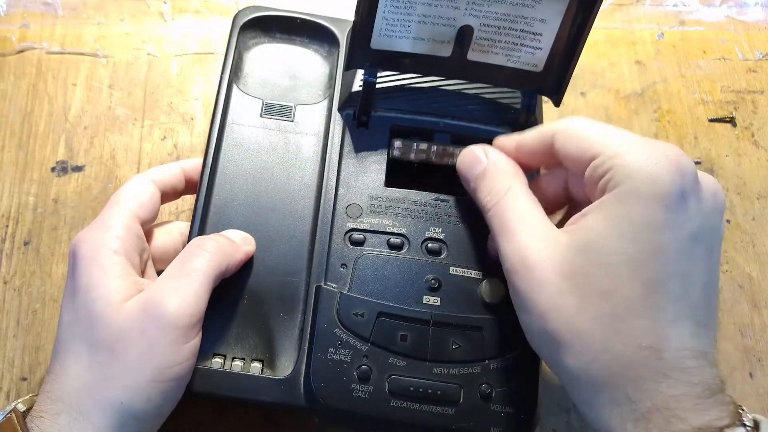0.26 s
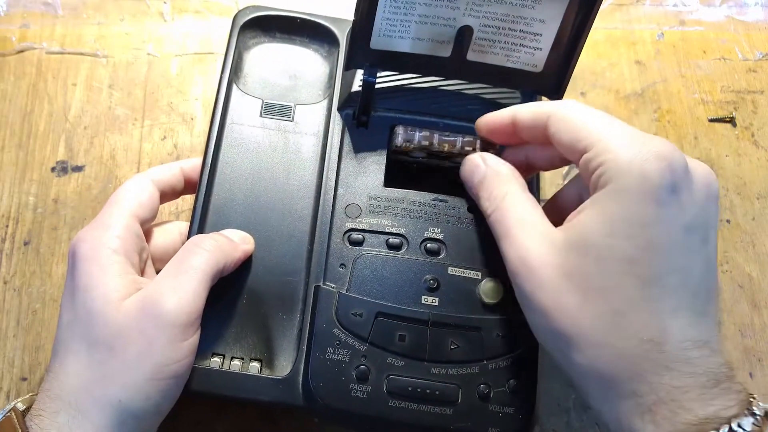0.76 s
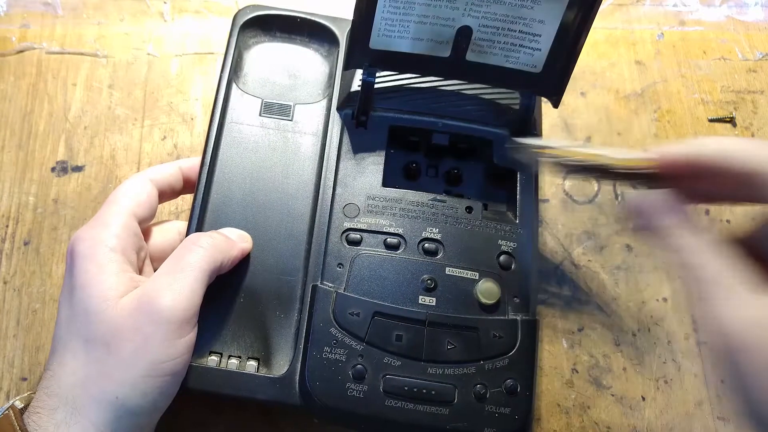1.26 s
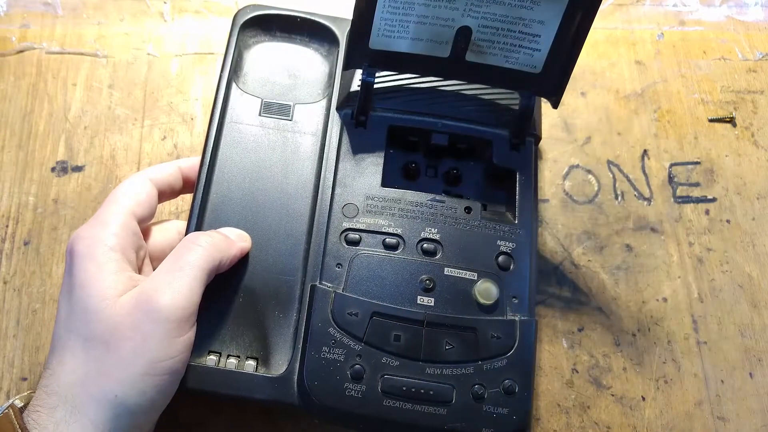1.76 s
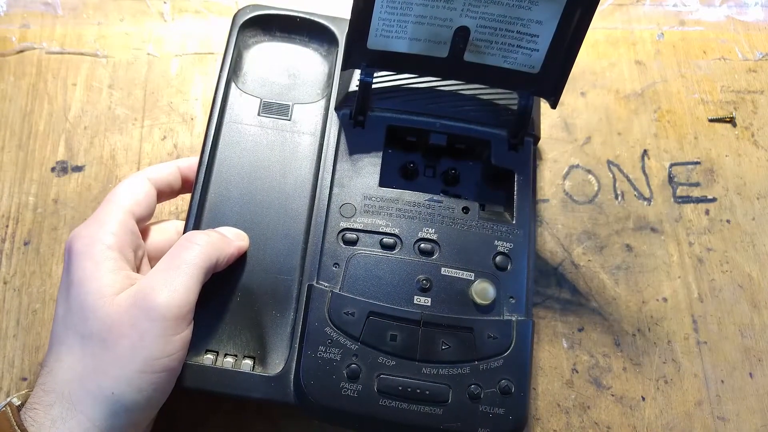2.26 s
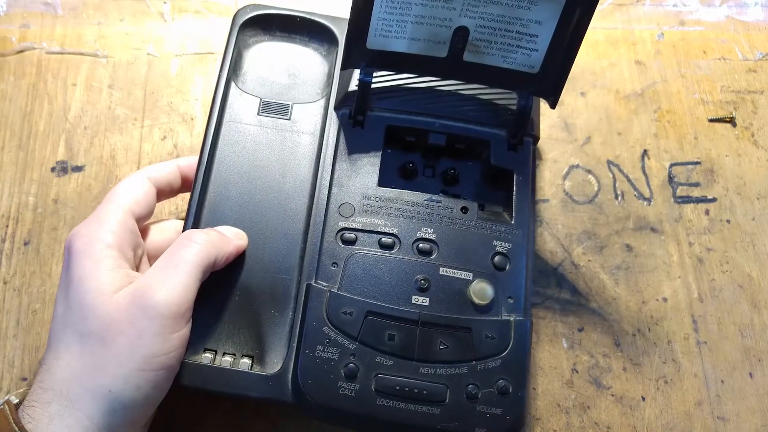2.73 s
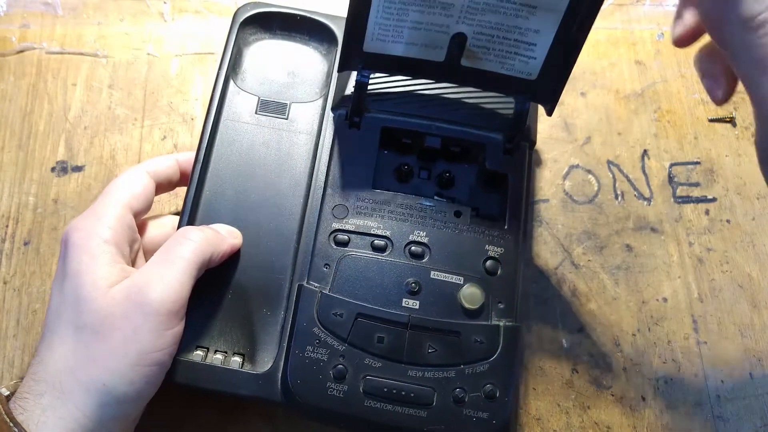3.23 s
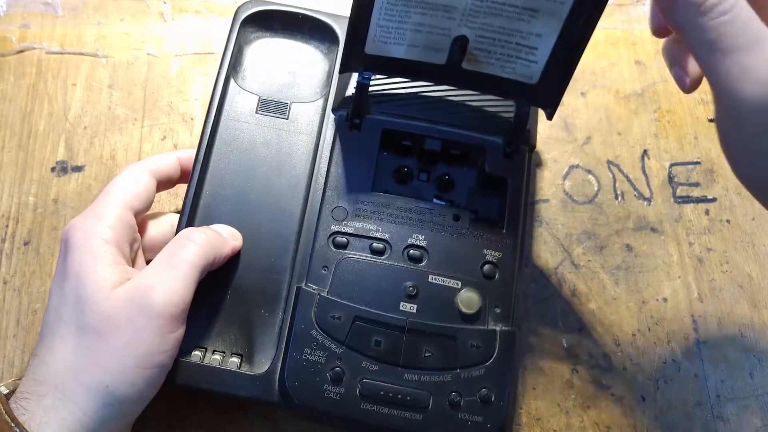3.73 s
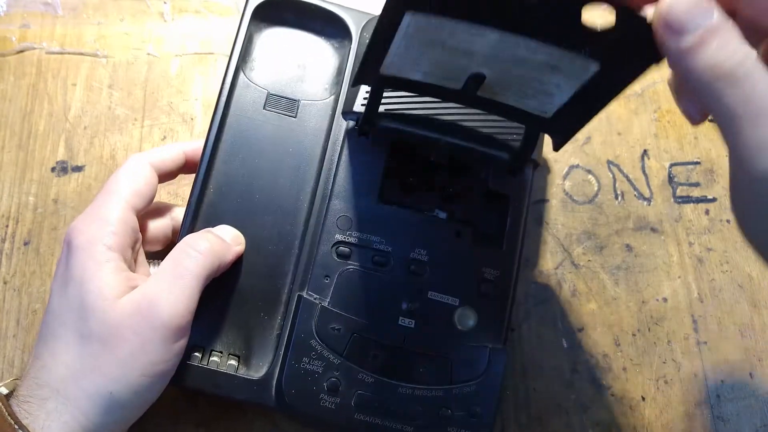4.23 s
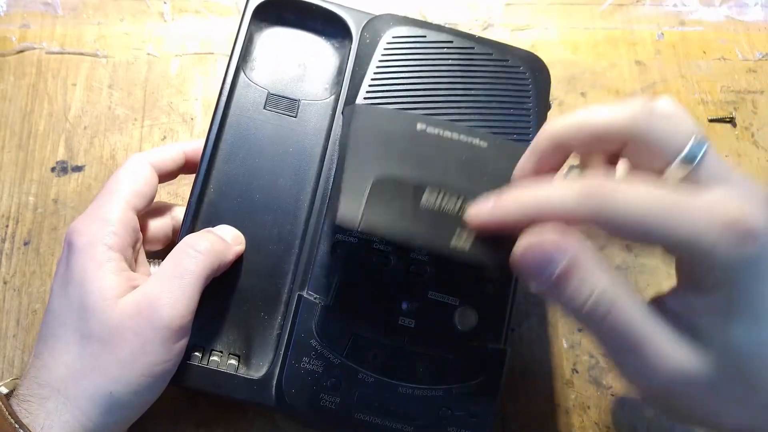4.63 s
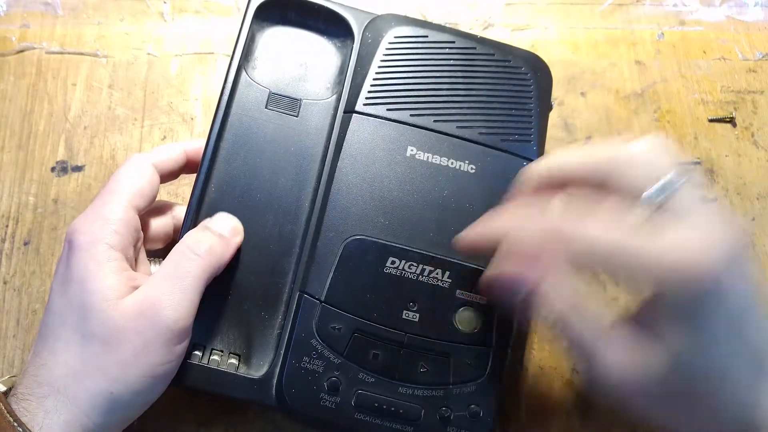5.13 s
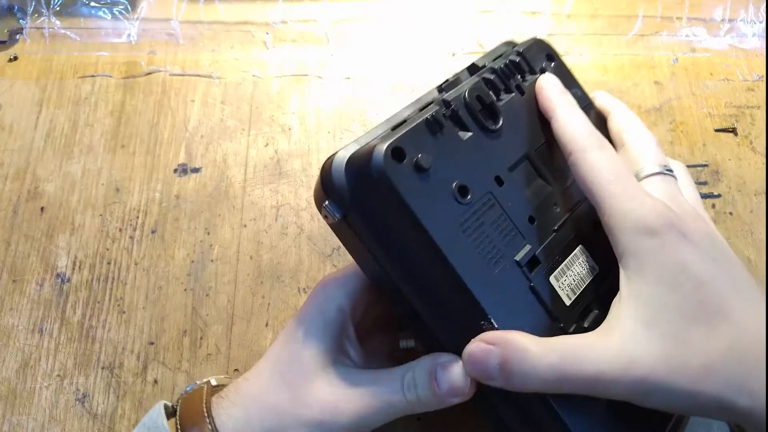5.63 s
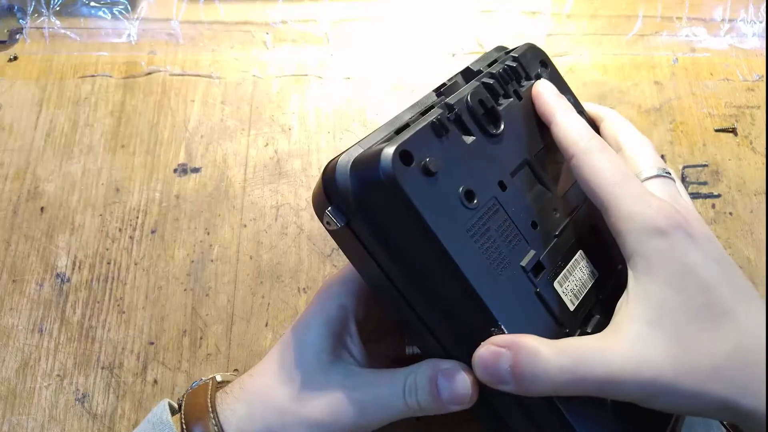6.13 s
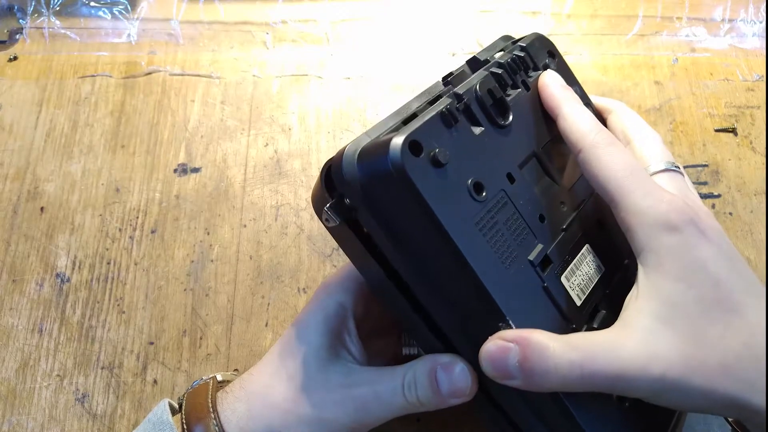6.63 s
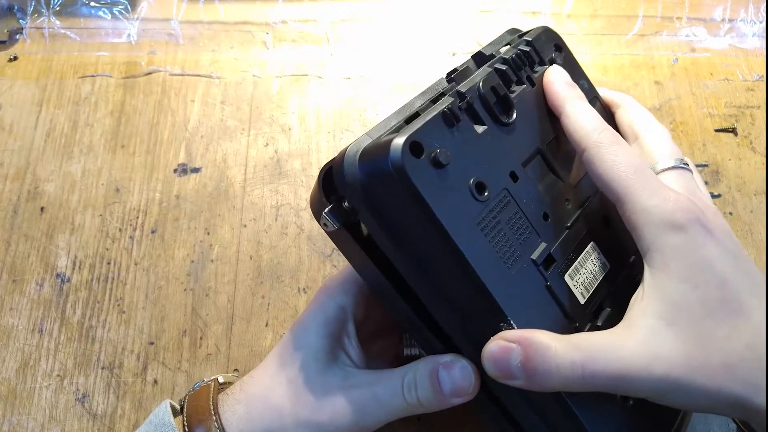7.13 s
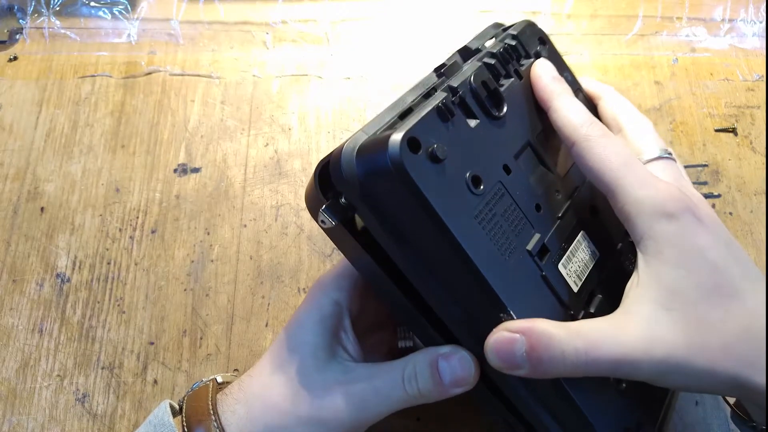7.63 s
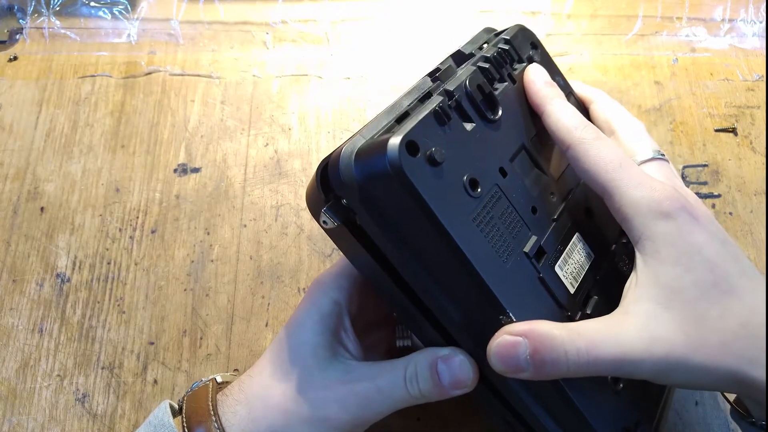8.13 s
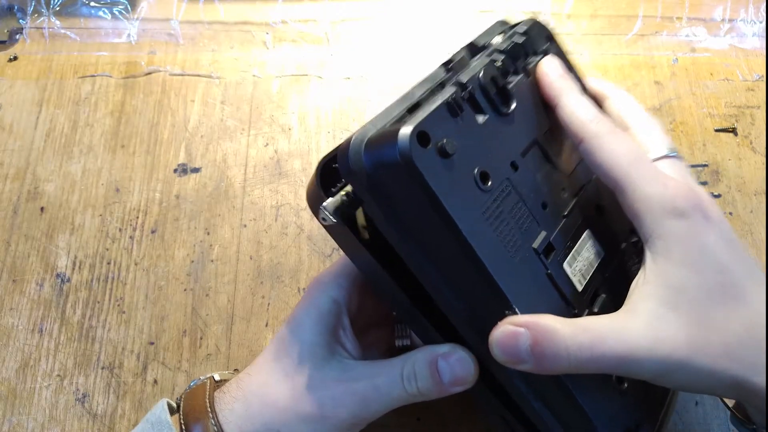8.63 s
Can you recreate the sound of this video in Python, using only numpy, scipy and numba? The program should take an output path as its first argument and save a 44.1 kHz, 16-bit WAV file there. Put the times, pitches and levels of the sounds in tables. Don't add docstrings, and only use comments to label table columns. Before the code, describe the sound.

A small cassette is cracked loose from a hollow plastic desk machine, the lid snaps shut hard, then the closed case is gripped and turned.

```python
import sys
import numpy as np
from scipy import signal
from scipy.fft import rfft, irfft, next_fast_len
from scipy.io import wavfile
from scipy.ndimage import uniform_filter1d
from numba import njit

SR = 44100
rng = np.random.default_rng(int(sys.argv[2]) if len(sys.argv) > 2 else 0)


def waveform_to_disk(signal):
    frames = np.transpose(np.atleast_2d(signal))
    scaled = np.clip(frames, -1, 1) * 32767
    samples = np.round(scaled).astype(np.int16)
    wavfile.write(sys.argv[1], SR, samples)


def makeup_ratio(level_db):
    decades = np.asarray(level_db, float) / 20
    return 10 ** decades


N = 391166
T = np.arange(N) / SR
SCENE_CHANGE_S = 5.512

# frequency in Hz, level in dB per Hz.
STILL_COLOUR = [(15, -31.5), (25, 1), (97, -4), (175, -13.5), (516, -25), (2160, -27.5), (14500, -29),
                (16500, -36)]
STILL_DB = -64.5
# frequency in Hz, decay time to -60 dB in seconds.
ROOM_T60 = [(200, .55), (1000, .16), (3000, .3), (7000, .225), (10000, .19), (14000, .15)]
ROOM_DB = -9.5

# start in seconds, peak level in dB.
JOLTS = [(0.032, -51.5), (0.412, -52.5), (0.61, -52), (1.925, -52), (2.279, -63), (2.369, -59),
         (2.544, -36), (2.866, -41), (2.93, -46), (2.999, -49), (3.189, -47.5), (3.312, -51.5), (3.44, -49),
         (3.56, -46), (3.68, -50), (4.0, -27.5), (4.305, -46), (4.934, -34.5), (5.097, -44), (5.443, -47),
         (5.896, -49), (6.105, -44), (6.145, -57.5), (6.504, -66), (6.569, -50), (6.62, -53), (6.679, -53),
         (8.796, -78)]
# time in seconds, weight in dB.
LEAN = [(0, -78), (.39, -84), (.59, -58), (.79, -80), (1.58, -84.5), (2.6, -70), (3.21, -61.5), (3.43, -54),
        (4.03, -67.5), (4.3, -51.5), (4.89, -81), (5.09, -48.5), (5.34, -54.5), (5.51, -73.5), (5.78, -67),
        (6.79, -72.5), (7.3, -89), (8.0, -72)]
# frequency in Hz, level in dB, decay time to -60 dB in seconds.
BENCH_MODES = [(57.4, -10, .3), (98.3, 1.5, 0.15), (148.4, -5.5, 0.14), (205.4, -7, 0.063),
               (242, -13.5, 0.2)]
# frequency in Hz, width in Hz, level in dB.
SLEEVE_TONES = [(385, 75, -1), (325, 70, -8.5), (865, 90, -23.5), (1930, 300, -21), (225, 120, -17.5)]
# start in seconds, end in seconds, level in dB.
DRAGS = [
    (1.764, 2.28, -52.5),
    (2.35, 2.596, -55),
    (3.35, 3.802, -64),
    (5.05, 5.35, -64),
    (5.7, 6.213, -62),
    (6.451, 6.647, -64),
]
DRAG_RISE_S, DRAG_FALL_S, SLEEVE_REST_DB = .18, .074, -16
PAT_DB, PAT_S = -12, .073

# time in seconds, topmost octave level in dB.
SWISHES = [
    [(1.8, -78.5), (1.806, -84.5), (2.098, -65), (2.26, -63.5)],
    [(4.3, -94), (4.478, -57.5), (4.802, -72.5), (4.88, -62.5)],
]

# time in seconds, sliding level in dB, grip level in dB.
HANDS = [(0, -61, -73), (.3, -66.5, -93), (1.36, -75, -95), (1.73, -72.5, -104), (2.19, -55.5, -74.5),
         (2.56, -51, -60.5), (2.75, -64, -85.5), (3.401, -71.5, -83), (4.17, -65.5, -86), (4.6, -58, -71),
         (5.02, -50, -61.5), (5.2, -71, -65), (5.57, -70.5, -66), (5.76, -93.5, -69.5), (6.7, -86, -70.5),
         (7.3, -86.5, -93.5), (7.8, -77, -78.5), (8.62, -79.5, -85)]
# start in seconds, end in seconds, hiss in dB, hollow hum in dB.
SCUFFS = [(0, 0.058, -58.5, -58.5), (.172, 0.261, -60, -70.5), (.444, 0.475, -63, -55),
          (0.677, .81, -61, -116), (0.961, 1.044, -49.5, -71.5), (1.049, 1.084, -46.5, -43.5),
          (2.291, 2.368, -58.5, -66), (2.385, 2.461, -50.5, -63.5), (2.486, 2.535, -40, -66),
          (3.177, 3.21, -58, -65.5), (3.316, 3.408, -71.5, -58), (0.477, 0.614, -90, -56.5),
          (0.653, 0.731, -91, -69.5), (0.751, 0.913, -106, -73.5), (4.383, 4.678, -56.5, -81),
          (4.9, 4.941, -47, -61.5), (5.46, 5.5, -64, -60), (5.534, 5.613, -74, -57),
          (5.676, 5.773, -62, -68.5), (5.894, 5.98, -66, -73), (6.512, 6.545, -47, -50),
          (6.545, 6.58, -52, -50), (6.646, 6.68, -54, -50), (6.886, 6.989, -60.5, -72.5),
          (7.469, 7.521, -76.5, -74), (7.772, 7.843, -79.5, -70), (7.906, 7.987, -63.5, -72),
          (8.2, 8.297, -61, -69), (8.647, 8.765, -61, -65.5), (8.774, 8.876, -55, -54),
          (8.822, 8.884, -51, -60)]
SCRAPE_DB, SCUFF_SCRAPE_DB = -9.5, -2
SCUFF_RING_DB = -6
# frequency in Hz, width in Hz, level in dB.
CAVITY = [(658, 70, -1.5), (495, 40, -12.5), (832, 100, -15), (1040, 140, -13.5), (1630, 79, -16.5)]
# time in seconds, level in dB.
SQUEAK = [
    (7.5, -100),
    (7.56, -76),
    (7.63, -68),
    (7.7, -74),
    (7.8, -74),
    (7.87, -100),
]
# frequency in Hz, level in dB.
SQUEAK_TONES = [(3000, 0), (6200, -9)]
# start in seconds, end in seconds, frequency in Hz, level in dB.
CHIRP = (.152, .198, 2020, -62)
# start in seconds, end in seconds, level in dB, frequency in Hz.
RUBS = [
    (4.25, 4.9, -64.5, 655),
    (4.5, 4.78, -70, 1700),
    (4.4, 4.75, -75, 1080),
    (4.78, 4.9, -68, 500),
    (3.42, 3.8, -78, 1980),
]
RUB_WIDTH, RUB_RISE_S, RUB_WAVER_DB = .18, .12, 3.0

# start in seconds, crack peak in dB, panel rattle in dB,
# hollow knock in dB, knock pitch in Hz.
SNAPS = [(.4802, -28, -37, -42.5, 658), (1.0324, -25, -38, -42, 567), (1.0608, -35.5, -40.5, -44, 547),
         (2.2772, -13, -37, -44, 455), (2.37, -20, -38.5, -45.5, 775), (2.5424, 10, -14.5, -26, 680),
         (3.3134, -26, -31, -27, 656), (3.9998, -23, -31, -23, 494), (4.9045, -38.5, -45.5, -38, 652),
         (4.921, -31, -38, -26.5, 618), (4.9336, 9, -10, -2.5, 575), (4.953, -16, -24, -15, 570),
         (4.9915, -30, -36, -25, 590), (5.0584, -33, -39.5, -29.5, 587), (5.3886, -28, -39, -31, 580),
         (5.4116, -26.5, -36, -36, 560), (5.4185, -30, -38, -39, 600), (5.4495, -23, -37, -32, 585),
         (5.4565, -31, -41, -38, 600), (5.4854, -31, -39, -37, 600), (5.4955, -42, -45, -39, 620),
         (6.5705, -44, -45, -36, 650), (6.5817, -28, -33, -33, 671), (6.5905, -28, -36, -35, 681),
         (6.599, -36, -39, -39, 660), (6.6224, -31, -32, -26, 900), (6.6295, -33, -36, -36, 655),
         (6.638, -36, -39, -42, 960), (6.6864, -32, -38, -45, 660), (6.6915, -31, -37, -45, 900),
         (6.698, -32, -37, -48, 900), (6.708, -39, -44, -50, 660), (8.788, -52, -50, -43, 860),
         (8.7945, -50, -48, -36, 800), (8.798, -46, -43, -27, 830), (8.8025, -52, -50, -34, 490),
         (8.8105, -54, -54, -39, 365), (8.8211, -39, -46, -48, 490), (8.8275, -37, -45, -55, 660),
         (8.8371, -31, -41, -55, 520), (8.8506, -26, -41.5, -50, 500), (8.8555, -29, -43, -52, 660),
         (8.8625, -34, -45, -52, 660)]
# start in seconds, crack peak in dB,
# hollow knock in dB, knock pitch in Hz.
TAPS_OPEN = [(.0189, -47.5, -54, 630), (.0897, -52.5, -66, 530), (.2024, -42.5, -63, 820),
             (.2286, -42, -68, 724), (.4127, -64.5, -56.5, 663), (.5434, -50, -61, 850),
             (.5864, -55, -50, 650), (.6744, -44, -57, 670), (.7413, -58, -53, 655), (.7967, -56, -69, 845),
             (.8594, -60, -69, 616), (1.5449, -72, -92, 659), (2.4144, -41, -48.5, 345),
             (2.4693, -38, -52.5, 776), (2.8735, -70, -57, 394.7), (3.1852, -46, -54, 672),
             (3.2297, -53.5, -46, 500), (3.27, -60, -52, 650), (3.5588, -50, -60, 397.6),
             (4.126, -56.5, -56, 511), (5.1367, -34.5, -40.5, 540), (5.2734, -70.5, -52, 640),
             (5.2964, -70, -44, 600), (5.3214, -54, -44, 673), (5.3462, -31.5, -35, 602),
             (5.3664, -35, -33, 662)]
# start in seconds, crack peak in dB,
# hollow knock in dB, knock pitch in Hz.
TAPS_SHUT = [(5.5303, -50, -39, 660), (5.5814, -50, -60, 516), (5.5994, -62.5, -41.5, 680),
             (5.6835, -52, -37, 638), (5.7409, -48, -41, 658), (5.7614, -54, -40, 652),
             (5.9133, -54.5, -51, 625), (5.9494, -67, -59.5, 630), (5.9764, -60.5, -43.5, 711),
             (6.1061, -33.5, -44.5, 483), (6.146, -35.5, -43.5, 480), (6.3804, -66.5, -50, 452),
             (6.4916, -49, -42, 620), (6.5128, -42, -50, 660), (6.524, -46, -42, 700),
             (6.6779, -37, -36, 702), (6.7715, -43.5, -56.5, 910), (6.8764, -51, -50.5, 658),
             (7.6494, -61, -65, 481.3), (7.9668, -53.5, -67.5, 659), (8.0764, -77, -51.5, 684),
             (8.2023, -49.5, -65, 546), (8.3494, -63, -68, 842), (8.5824, -49.5, -49.5, 667),
             (8.6522, -46.5, -63.5, 655), (8.7094, -44, -55.5, 865), (8.7501, -48, -52, 659),
             (8.7695, -40.5, -44, 704)]
RATTLE_OPEN_DB, RATTLE_SHUT_DB = -11, -9
EDGE_SOFT_DB, EDGE_HARD_DB, EDGE_SLOPE, EDGE_FROM_DB = -25, -14.5, .7, -32
CHATTER_S, CHATTER_GROWTH = .0102, .058
FIRST_TOUCH_S, FIRST_TOUCH_DB = .0018, 4.5
PUSH_DB, PUSH_S = 11, .0003
EARLY_S = .0007
# frequency in Hz, level in dB.
PANELS = [(650, -9.5), (950, 1), (1300, -1), (1700, 0), (2400, 0), (3200, -3.5), (4300, 0), (5800, -14)]
# pitch ratio, level in dB, decay time to -60 dB in seconds.
HOLLOW = [(1, 0, .062), (.76, -14, .04), (.87, -11, .05), (1.13, -10, .045), (1.32, -14, .035),
          (1.8, -9, .05)]
# frequency in Hz, level in dB.
THUD_COLOUR = [(330, -30), (480, -2), (800, 1), (1300, -2), (2000, -25.5)]
THUD_DB = -10

# frequency in Hz, level in dB.
PORT_LEFT = [(2500, -36), (4000, -12.5), (5500, -7.5), (6800, 1), (8500, -2), (10500, -11.5),
             (13000, -17.5), (16000, -18.5)]
# frequency in Hz, level in dB.
PORT_RIGHT = [(2500, -23.5), (4000, -8), (5500, 1), (7000, 8), (8000, 0.5), (10500, -22), (13000, -28),
              (16000, -20)]
# threshold in dB, delay in seconds, attack in seconds, release in seconds, strength from 0 to 1.
GAIN_RIDE = (-15, .012, .002, .19, .55)
TOP_HZ = 16300


def shaped(x, points):
    size = next_fast_len(x.shape[-1])
    hz, db = np.transpose(points)
    log_hz = np.log(np.arange(size // 2 + 1) * SR / size + 1)
    gain = makeup_ratio(np.interp(log_hz, np.log(hz), db))
    return irfft(rfft(x, size) * gain, size)[..., :x.shape[-1]]


def unit(x):
    return x / np.sqrt(np.mean(np.abs(x) ** 2))


def walk(rate):
    hold = int(SR / rate)
    steps = np.repeat(rng.standard_normal(N // hold + 1), hold)
    return unit(uniform_filter1d(steps, hold)[:N])


def narrow(hz, width_hz):
    pole = np.exp(-np.pi * width_hz / SR)
    noise = rng.standard_normal(N) + 1j * rng.standard_normal(N)
    slow = signal.lfilter([1], [1, -2 * pole, pole ** 2], noise)
    return unit(np.real(slow * np.exp(2j * np.pi * hz * T)))


def ring(modes, scale, chance, t, scatter_db, detune=.039):
    hz, db, t60 = np.transpose(modes)[:, :, None]
    gain_chance, pitch_chance = chance[:len(hz), None], chance[-len(hz):, None]
    tone = np.sin(2 * np.pi * scale * hz * (1 + detune * pitch_chance) * t)
    return np.sum(makeup_ratio(db + scatter_db * gain_chance) * tone * 1000 ** (-t / t60), axis=0)


def add(out, s, x):
    i = int(s * SR)
    out[..., i:i + x.shape[-1]] += x[..., :N - i]


def ports(left, right):
    return np.array([shaped(left, PORT_LEFT), shaped(right, PORT_RIGHT)])


def still():
    mid, side = shaped(rng.standard_normal((2, N)), STILL_COLOUR)
    side = shaped(side, [(60, -10.5), (300, 2.5), (1000, 1.0)])
    return unit(mid + side * np.array([[1], [-1]])) * makeup_ratio(STILL_DB + 1.0 * walk(9))


def room(x):
    t, tail = np.arange(20000) / SR, 0
    t60_hz, t60_s = np.transpose(ROOM_T60)
    for hz in 150 * 2 ** np.arange(0, 7, .5):
        t60 = np.interp(np.log(hz), np.log(t60_hz), t60_s)
        half_octave = [(hz / 1.6, -30), (hz / 1.2, -3), (hz, 0), (hz * 1.2, -3), (hz * 1.6, -30)]
        tail = tail + shaped(rng.standard_normal((2, len(t))), half_octave) * 1000 ** (-t / t60)
    tail = tail[0] + shaped(tail - tail[0], [(150, -2.0), (1500, -1)])
    tail = tail * np.clip((t - .003) / .006, 0, 1)
    return makeup_ratio(ROOM_DB) * signal.fftconvolve(x, unit(tail) / np.sqrt(len(t)), axes=1)[:, :N]


def bench():
    out, t = np.zeros(N), np.arange(20000) / SR
    for s, db in JOLTS:
        boom = ring(BENCH_MODES, .98, rng.standard_normal(10), t, scatter_db=3.5) * np.minimum(t / .03, 1)
        add(out, s, makeup_ratio(db + 3.5) * boom / np.abs(boom).max())
        pat = shaped(rng.standard_normal(len(t)), [(90, -20.5), (150, 0.5), (330, -2.5), (600, -26)])
        add(out, s, makeup_ratio(db + PAT_DB) * unit(pat) * np.exp(-t / PAT_S) * np.minimum(t / .003, 1))
    weight_db = np.interp(T, *np.transpose(LEAN))
    drag = makeup_ratio(weight_db + SLEEVE_REST_DB)
    for start, end, db in DRAGS:
        swell = np.interp(T, [start - DRAG_RISE_S, start, end, end + DRAG_FALL_S], [0, 1, 1, 0])
        drag = drag + makeup_ratio(db) * swell ** 2
    rumble = sum(makeup_ratio(db) * narrow(hz, 4.0 / t60 + 20) for hz, db, t60 in BENCH_MODES)
    sleeve = sum(makeup_ratio(db) * narrow(hz, width) for hz, width, db in SLEEVE_TONES)
    out = out + unit(rumble) * makeup_ratio(weight_db + 3.0 * walk(28) + 1.0)
    out = out + unit(sleeve) * drag * makeup_ratio(.59 * walk(25) - 3.5)
    return shaped(out, [(20, -24), (50, -1)])


def cloth():
    gain = sum(np.interp(T, s, makeup_ratio(db), left=0, right=0) for s, db in map(np.transpose, SWISHES))
    airy = [(1200, -21), (1800, -9), (3000, -12.5), (6000, -12.5), (9500, 1.0), (15500, -7)]
    return unit(shaped(rng.standard_normal((2, N)), airy)) * gain * makeup_ratio(5.0 + 1.0 * walk(30))


def squeaks():
    squeak = sum(makeup_ratio(db) * narrow(hz, 55.) for hz, db in SQUEAK_TONES)
    squeak = squeak * makeup_ratio(np.interp(T, *np.transpose(SQUEAK)) + 2 * walk(35))
    start, end, chirp_hz, chirp_db = CHIRP
    swell = np.interp(T, [start, (start + end) / 2, end], [0, 1, 0])
    squeak = squeak + makeup_ratio(chirp_db) * np.sin(2 * np.pi * chirp_hz * T) * swell
    for start, end, db, hz in RUBS:
        swell = np.interp(T, [start - RUB_RISE_S, start + RUB_RISE_S, end - .02, end + .02], [0, 1, 1, 0])
        squeak = squeak + makeup_ratio(db + RUB_WAVER_DB * walk(22)) * narrow(hz, RUB_WIDTH * hz) * swell
    return squeak


def rubbing_gains():
    s, slide_db, grip_db = np.transpose(HANDS)
    columns = slide_db, (slide_db + grip_db) / 2 + SCRAPE_DB, grip_db
    gains = makeup_ratio(np.array([np.interp(T, s, c) for c in columns]) - 3.5)
    gains = np.vstack([gains, np.zeros(N)])
    for start, end, hiss_db, hum_db in SCUFFS:
        scrape_db = (hiss_db + hum_db) / 2 + SCUFF_SCRAPE_DB
        levels = makeup_ratio(np.array([hiss_db, scrape_db, hum_db + SCUFF_RING_DB, hum_db]))
        slip = np.interp(T, [start - .004, start + .0047, end - .015, end + .0099], [0, 1, 1, 0])
        gains = gains + levels[:, None] * slip
    return gains


def rubbing():
    hiss_gain, scrape_gain, hum_gain, brush_gain = rubbing_gains()
    uneven = makeup_ratio(2.0 * walk(60))
    grit = rng.standard_normal((3, N)) * makeup_ratio(.83 * walk(900))
    common = ports(np.roll(grit[0], 1), grit[0])
    wide = ports(np.roll(grit[1], -11), grit[1]) * np.array([[1], [-1]])
    hiss = unit(common + .75 * wide)
    hiss = shaped(hiss, [(8500, .0048), (12000, -3)])
    scrape = unit(shaped(grit[2], PANELS))
    hum = unit(sum(makeup_ratio(db) * narrow(hz, width) for hz, width, db in CAVITY))
    hum = hum * makeup_ratio(2 * walk(30))
    brush = unit(shaped(rng.standard_normal(N), THUD_COLOUR)) * makeup_ratio(3.0 * walk(45))
    dry_rub = uneven * (hiss * hiss_gain + scrape * scrape_gain)
    return dry_rub + hum * hum_gain + brush * brush_gain + squeaks()


def all_contacts():
    hits = list(map(tuple, SNAPS))
    for table, rattle_db in ((TAPS_OPEN, RATTLE_OPEN_DB), (TAPS_SHUT, RATTLE_SHUT_DB)):
        for s, crack_db, knock_db, hz in table:
            hits.append((s, crack_db, (crack_db + knock_db) / 2 + rattle_db, knock_db, hz))
    return sorted(hits)


def chatter(crack_db, live, t):
    length = CHATTER_S * makeup_ratio(CHATTER_GROWTH * (crack_db + 26))
    fall = np.exp(-(t / length) ** 2.1) * np.minimum(t / .0008, 1)
    return live * fall * (1 + makeup_ratio(FIRST_TOUCH_DB) * np.exp(-t / FIRST_TOUCH_S)) / 2


def crack_burst(crack_db, noise, grit, fall, lag):
    shared = noise[0] * grit
    burst = (np.array([np.roll(shared, lag), shared]) + .5 * noise[[4, 1]]) * fall
    burst = burst * np.sqrt(1.65 * np.mean(fall ** 2) / np.mean(burst ** 2))
    edge_db = np.clip(EDGE_SOFT_DB + EDGE_SLOPE * (crack_db - EDGE_FROM_DB), EDGE_SOFT_DB, EDGE_HARD_DB)
    air = signal.butter(2, 9500, "high", fs=SR, output="sos")
    return burst + (makeup_ratio(edge_db + 18.0) - 1) * signal.sosfilt(air, burst)


def contacts():
    crack, panel, knocks, thuds = np.zeros((2, N)), np.zeros((2, N)), np.zeros(N), np.zeros(N)
    t = np.arange(5000) / SR
    for s, crack_db, panel_db, knock_db, knock_hz in all_contacts():
        chance, noise = rng.standard_normal(14), rng.standard_normal((5, len(t)))
        grit = makeup_ratio(3.0 * uniform_filter1d(noise[1], 14) * np.sqrt(14))
        live = (s > SCENE_CHANGE_S) | (s + t < SCENE_CHANGE_S)
        fall = chatter(crack_db, live, t)
        burst = crack_burst(crack_db, noise, grit, fall, int(4.5 + 2.0 * chance[13]))
        balance_db = 1.0 * chance[12] * np.array([[1], [-1]])
        add(crack, s - EARLY_S, makeup_ratio(crack_db + 3.5 + balance_db) * burst)
        rattle = noise[3] * np.sqrt(grit)
        add(panel, s - EARLY_S, makeup_ratio(panel_db + 13) * np.array([np.roll(rattle, 4), rattle]) * fall ** .55)
        push = makeup_ratio(PUSH_DB) * np.exp(-t / PUSH_S) * np.minimum(t / .0008, 1)
        cavity = ring(HOLLOW, knock_hz, chance[:12], t, scatter_db=2.5, detune=.01)
        knock = signal.fftconvolve(noise[2] * fall ** .97 + push, cavity)[:len(t)]
        add(knocks, s - EARLY_S, makeup_ratio(knock_db + 7) * live * knock / np.abs(knock).max())
        add(thuds, s - EARLY_S, makeup_ratio(knock_db + THUD_DB + 6.5) * noise[2] * fall ** .6)
    hollow = shaped(thuds, THUD_COLOUR) + shaped(knocks, [(210, -26.0), (390, 0)])
    return ports(crack[0], crack[1]) + shaped(panel, PANELS) + hollow


def scene():
    near, first = contacts() + rubbing() + cloth(), T < SCENE_CHANGE_S
    before, after = near * first, near * ~first
    return (before + room(before)) * first + after + room(after) + bench() + still()


@njit
def follow(x, rise, sink):
    out, e = np.empty(len(x)), 1e-9
    for i in range(len(x)):
        e += (x[i] - e) * (rise if x[i] > e else sink)
        out[i] = e
    return out


def band_limit(x):
    return signal.sosfilt(signal.butter(12, 16330, fs=SR, output="sos"), x)


def record(dry):
    top_db, delay, attack, release, strength = GAIN_RIDE
    level = follow(np.abs(dry).max(axis=0).clip(0, 1), 1 / (attack * SR), 1 / (release * SR))
    level = np.interp(T - delay, T, level)
    ridden = dry * np.minimum(makeup_ratio(top_db) / level, 1) ** np.clip(strength, 0, 1)
    mix = .84 * np.tanh(ridden / 1.12)
    mix = signal.sosfilt(signal.butter(1, 45, "high", fs=SR, output="sos"), mix)
    mix = signal.sosfilt(signal.ellip(8, .3, 50, TOP_HZ, fs=SR, output="sos"), mix)
    return band_limit(mix)


dry = scene()
out = record(dry)
waveform_to_disk(out)
```